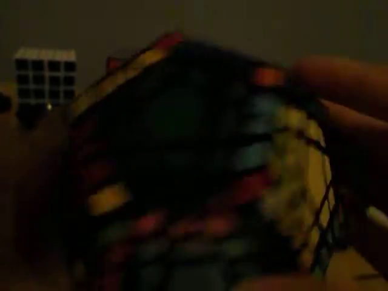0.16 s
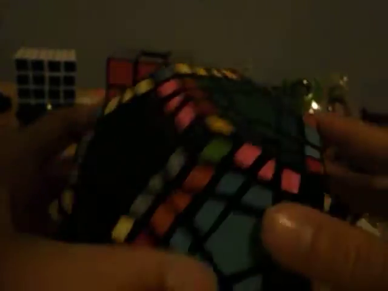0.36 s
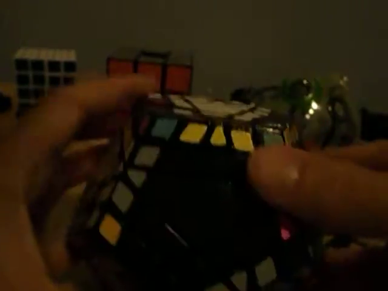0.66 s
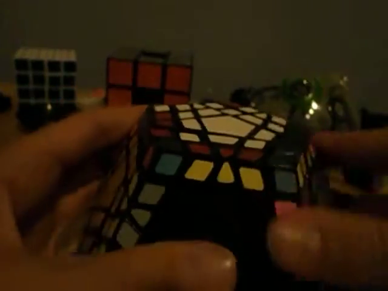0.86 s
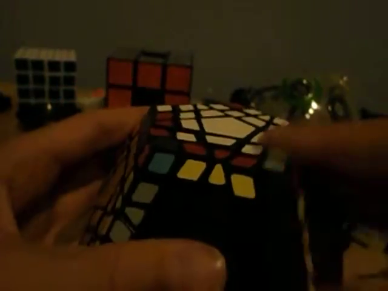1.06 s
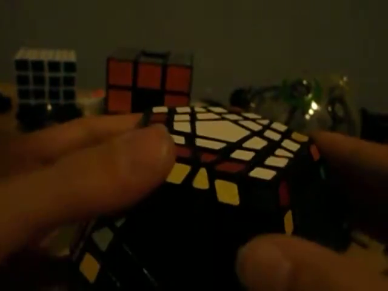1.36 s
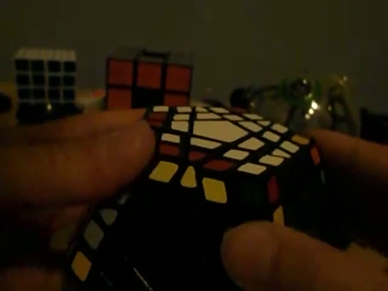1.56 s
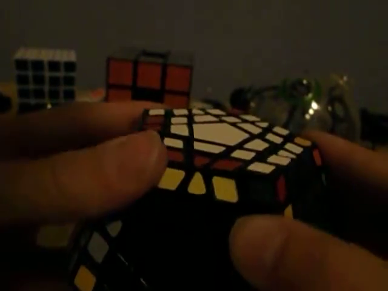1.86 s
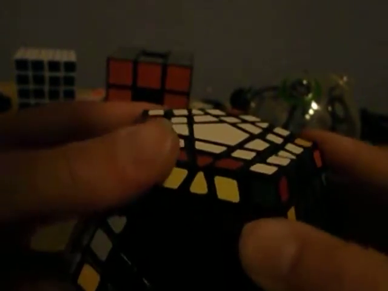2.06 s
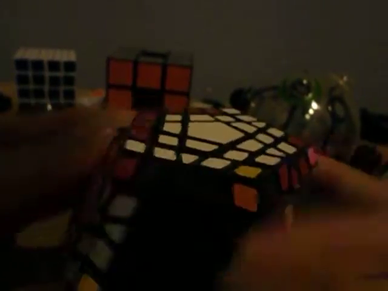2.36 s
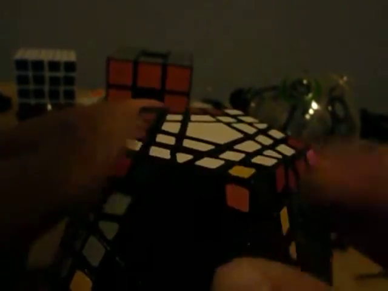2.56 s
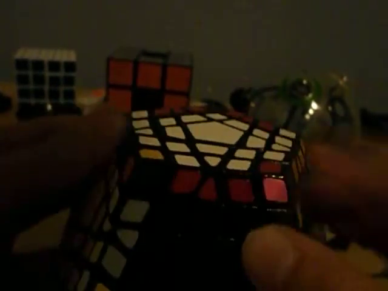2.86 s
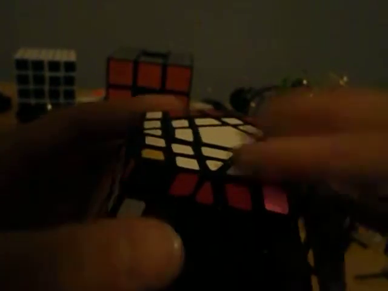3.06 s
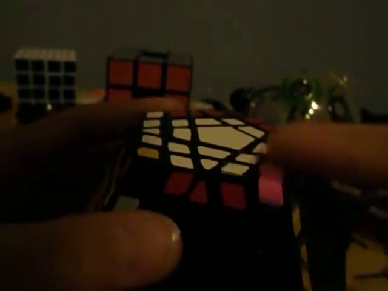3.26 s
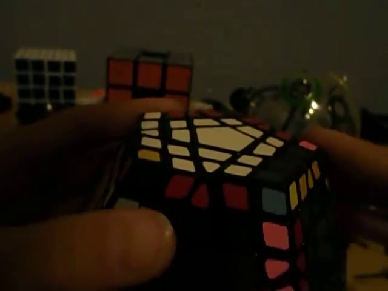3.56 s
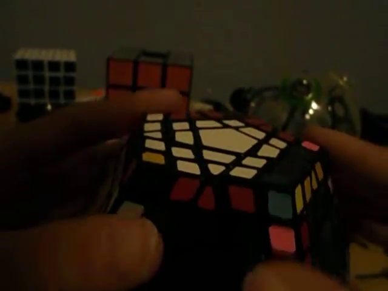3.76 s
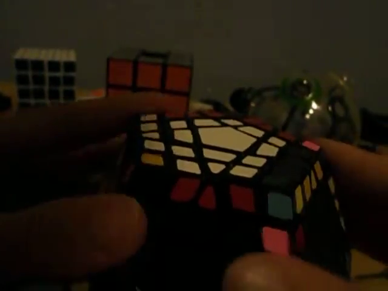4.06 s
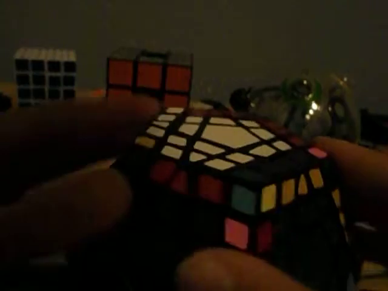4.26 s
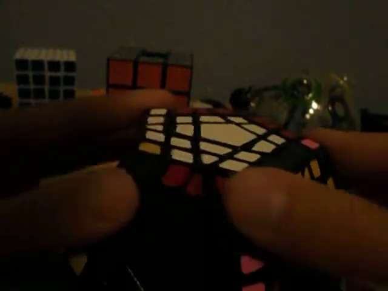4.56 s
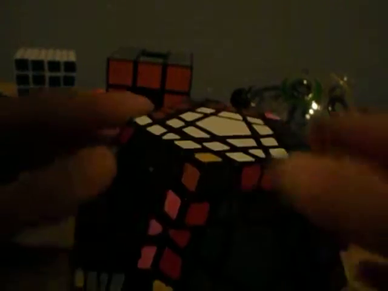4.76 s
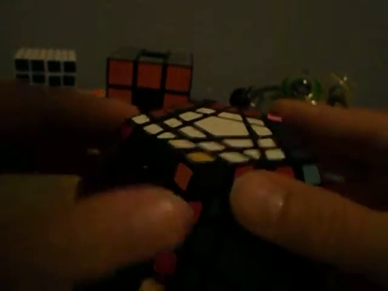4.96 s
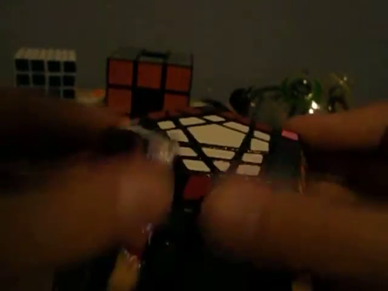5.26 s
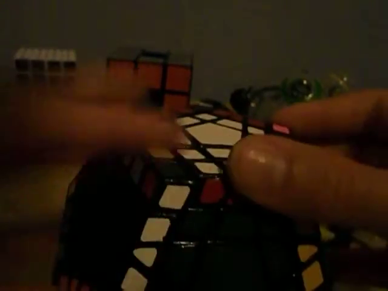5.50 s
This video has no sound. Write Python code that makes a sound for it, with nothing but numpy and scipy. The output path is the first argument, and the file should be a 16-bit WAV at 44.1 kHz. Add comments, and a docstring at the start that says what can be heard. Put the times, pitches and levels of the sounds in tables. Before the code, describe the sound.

Fingers slide dryly over hard plastic, bump its hollow body and snap its layers round. Brief rattling runs of sharp, bright clicks alternate with half-second lulls of light rustling and tiny loose-piece ticks. Close, slightly dull-topped microphone, small quiet indoor space with a short soft tail and faint hush; the strongest clacks are nearly overloaded.

```python
"""First comes the soft hiss of hands shifting their grip on a many-layered plastic twisty puzzle.
Fingertips brush its faces, pieces catch and snap, knocks sound the hollow body, turning layers rattle.
Skin and rattle are trains of tiny random impacts, filtered and swelled with each move of the hands.
Snaps are short filtered noise bursts; knocks are decaying low tones with a woody clack of noise.
A quiet room adds echoes, a brief low hum and a soft tail; a microphone colours and limits it all."""
import sys
import numpy as np
from scipy import signal
from scipy.io import wavfile

SR = 44100
rng = np.random.default_rng(int(sys.argv[2]) if len(sys.argv) > 2 else 0)


def transcribe(signal):
    """Save signal, clipped to [-1, 1], as a 16-bit WAV file at the path in sys.argv[1]."""
    frames = np.atleast_2d(signal).T
    limited = np.clip(frames, -1, 1)
    pcm = np.round(limited * 32767).astype(np.int16)
    wavfile.write(sys.argv[1], SR, pcm)


N = 248283  # length in samples
TIME = np.arange(N) / SR


def amp(db):
    """Turns decibels into a gain."""
    return 10 ** (np.asarray(db) / 20)


def unit(x):
    """Scales a sound to an rms of 1."""
    return x / np.sqrt(np.mean(x ** 2) + 1e-20)


def read(points, hz):
    """Reads a table between its points, along a logarithmic frequency axis."""
    f, value = np.transpose(points)
    return np.interp(np.log(hz + 1), np.log(f + 1), value)


def add(mix, s, sound):
    """Mixes a sound in, starting at s seconds."""
    part = mix[max(round(s * SR), 0):][:len(sound)]
    part += sound[:len(part)]


def colour(x, spectrum, ring_hz=5000, ring_db=0, width_hz=900, size=2048):
    """Filters with a spectrum and one extra resonance; minimum phase, so nothing sounds early."""
    hz = abs(np.fft.fftfreq(size, 1 / SR))
    resonance_db = ring_db / (1 + ((hz - ring_hz) / width_hz) ** 2)
    gain = amp(read(spectrum, hz) + resonance_db)
    minimum_phase = np.exp(np.conj(signal.hilbert(np.log(gain))))
    response = np.fft.ifft(minimum_phase).real
    return signal.fftconvolve(x, response)[:len(x)]


def contacts(per_s, spread_db):
    """Surfaces touch at random points: a train of tiny impacts, most weak and a few strong."""
    size = amp(spread_db * np.minimum(rng.exponential(1, N), 3))
    sign = rng.choice([-1, 1], N)
    return size * sign * (rng.random(N) < per_s / SR)


def envelope(start, length, attack_s, release_s, arch_db, swell_db=0):
    """One move of the hand: rises until start, arches and swells over its length, then dies away."""
    early = np.maximum(start - TIME, 0)
    late = np.maximum(TIME - start - length, 0)
    progress = np.clip((TIME - start) / length, 0, 1)
    effort_db = swell_db * (progress - .5) + arch_db * (np.sin(np.pi * progress) - 1)
    return amp(effort_db) * np.exp(-early / attack_s - late / release_s)


# Tone of hard plastic cracking on plastic. Each row: frequency in Hz, relative level in dB per Hz.
CRACK = [(500, -31), (1300, -29), (2000, -8), (2650, -5), (3300, -6.5), (4200, -3.5), (5500, -0.5),
         (6900, -3), (8800, -4), (11000, -8.5), (16000, -44)]
# Tone of the hollow shell. Each row: frequency in Hz, relative level in dB per Hz.
SHELL = [(90, -34.5), (190, -10.5), (310, -1), (420, -9), (600, -6), (850, 0), (1250, -6), (1700, -16),
         (3000, -28)]


def loose_pieces(count=3):
    """Fingers nudge loose pieces: small irregular ticks, each piece with its own ring and hollow."""
    out = np.zeros(N)
    rings_hz, cavities_hz = np.geomspace(4300, 6100, count), np.geomspace(750, 1250, count)
    for ring_hz, cavity_hz in zip(rings_hz, cavities_hz):
        nudges = contacts(per_s=110, spread_db=6)
        crack = unit(colour(nudges, CRACK, ring_hz=ring_hz, ring_db=6, width_hz=800))
        shell = unit(colour(nudges, SHELL, ring_hz=cavity_hz, ring_db=9, width_hz=110))
        out += amp(-6) * crack + amp(-7) * shell
    return out / np.sqrt(count)


# Tone of skin sliding on plastic. Each row: frequency in Hz, relative level in dB per Hz.
SLIDE = [(150, -2), (450, -6), (900, -2.5), (1900, -4.5), (3300, -4), (5200, -0.5), (7000, -5),
         (10000, -5.5), (16000, -9.5)]
# Tone of dull bumps from the grip. Each row: frequency in Hz, relative level in dB per Hz.
FUMBLE = [(20, -37), (50, -6.5), (85, -15.5), (125, -6.5), (190, 0), (320, 1), (430, -12.5), (900, -16),
          (1600, -14), (4000, -55.5)]
# The hands shift their grip. Each row: start in seconds, length in seconds, level of the sliding hiss
# in dB, level of the dull fumbling in dB (before the levels of its bumps and ticks).
REGRIPS = [(0, 0.19, -51.5, -76), (.32, 0.49, -50.5, -48), (.95, 0.17, -48, -51), (1.23, 0.05, -58, -49.5),
           (1.38, 0.17, -51.5, -44.5), (1.61, 0.048, -47.5, -43), (1.75, 0.16, -53.5, -52),
           (1.95, 0.017, -50, -38), (2.17, 0.075, -47.5, -43.5), (2.3, .12, -45.5, -48.5),
           (2.6, 0.26, -50, -54.5), (3.005, 0.05, -50, -43), (3.34, .2, -52.5, -63),
           (3.58, 0.092, -50, -49.5), (3.72, 0.17, -48.5, -46), (3.9, 0.2, -43.5, -44),
           (4.09, 0.091, -48.5, -54), (4.22, 0.16, -51.5, -44.5), (4.5, 0.18, -49, -52.5),
           (4.72, 0.12, -45.5, -47), (4.87, 0.097, -47.5, -43), (5.045, 0.033, -40, -42.5),
           (5.29, 0.035, -46.5, -49), (5.37, 0.07, -48.5, -42), (5.55, 0.06, -53, -46)]
RESTING_SLIDE_DB, RESTING_FUMBLE_DB = -57, -60.5  # hands just holding the puzzle
TURNING_SLIDE_DB = -43  # hands pushing a layer round
GRIP_ATTACK_S, GRIP_RELEASE_S, GRIP_ARCH_DB = 0.026, 0.025, 2.5  # each move swells towards its middle


def hands():
    """Skin slides over the faces; the shifting grip bumps the body and shuffles loose pieces."""
    slide, fumble = amp(RESTING_SLIDE_DB), amp(RESTING_FUMBLE_DB)
    pushes = [(start, length, TURNING_SLIDE_DB, fumble_db) for start, length, *_, fumble_db in TURNS]
    for start, length, slide_db, fumble_db in list(REGRIPS) + pushes:
        move = envelope(start, length, GRIP_ATTACK_S, GRIP_RELEASE_S, GRIP_ARCH_DB)
        # where moves overlap, the stronger one is heard
        slide = np.maximum(slide, amp(slide_db) * move)
        fumble = np.maximum(fumble, amp(fumble_db) * move)
    skin = contacts(per_s=14000, spread_db=5)
    hiss = slide * unit(colour(skin, SLIDE, ring_hz=4970, ring_db=2, width_hz=1200))
    bumps = amp(-1) * fumble * unit(colour(contacts(per_s=190, spread_db=3.5), FUMBLE))
    return hiss + bumps + fumble * loose_pieces()


# A fingertip brushes over a face. Each row: moment of the peak in seconds, level in dB,
# time to swell or fade in seconds, centre of the bright band in Hz.
BRUSHES = [(0.054, -47, 0.045, 7650), (0.214, -45.5, 0.027, 7050), (.997, -40.5, 0.014, 6130),
           (2.21, -40, 0.047, 5830), (3.905, -45, 0.023, 5460), (4.792, -47, 0.045, 6500),
           (5.31, -44.5, .02, 6050)]


def brushes():
    """Dry skin makes many tiny contacts with a face: a bright swish that swells and fades."""
    out = np.zeros(N)
    for s, db, length_s, hz in BRUSHES:
        skin = contacts(per_s=11000, spread_db=2.5)
        swish = unit(colour(skin, SLIDE, ring_hz=hz, ring_db=26, width_hz=4000))
        out += amp(db) * np.exp(-((TIME - s) / length_s) ** 2) * swish
    return out


# The clearest catches of one piece on another. Each row: moment of release in seconds, crack level in dB,
# time for the chatter to peak in milliseconds, hollow shell level in dB (both levels before a fixed trim).
SNAPS = [(0.112, -31, 0.86, -42), (.2271, -31.5, 0.99, -32), (0.2358, -30.5, 0.91, -28.5),
         (0.2673, -41.5, .8, -33), (.378, -26.5, 0.77, -24.5), (0.491, -38, 1.2, -36.5),
         (.5615, -18.5, .9, -19), (0.6992, -37, 0.33, -34.5), (0.7537, -25, 0.77, -24.5),
         (0.7775, -14.5, 0.67, -20.5), (.789, -21, 1.3, -25.5), (.807, -24, 1.7, -31),
         (.836, -27, 0.55, -28.5), (.861, -22.5, 1.2, -30.5), (.87, -23.5, 1.2, -36),
         (1.2177, -45, 0.35, -46), (1.4135, -29, 1.8, -29), (1.4223, -29.5, .6, -37),
         (1.445, -37, .45, -50), (1.4517, -26.5, .9, -33.5), (1.4874, -42, 1, -52),
         (1.5286, -30, 0.93, -30.5), (1.6324, -43, 0.61, -34), (1.656, -39, 1.6, -31),
         (1.6664, -35.5, 0.92, -42), (1.7217, -39, 1, -36.5), (1.7459, -28, 0.5, -29.5),
         (1.825, -36, 2, -32.5), (1.8811, -40, 0.3, -32.5), (1.919, -39, 0.82, -39),
         (1.944, -34.5, 0.37, -33.5), (1.9778, -36, 0.28, -36), (2.1018, -15, 0.85, -13),
         (2.1183, -9.5, 0.56, -39), (2.1268, -9, 0.69, -41), (2.1362, -12.5, 1.3, -40),
         (2.1406, -11.5, 0.32, -21.5), (2.2556, -30.5, 0.48, -35), (2.275, -40, 2, -40),
         (2.3538, -34.5, 1, -34.5), (2.4044, -36.5, 1.5, -34.5), (2.468, -26, 1.1, -31),
         (2.481, -21, 2.7, -22.5), (2.5011, -12, .8, -18.5), (2.5126, -13, 0.69, -23),
         (2.5204, -14.5, 0.41, -28), (2.5302, -28, 1.5, -32), (2.9237, -41.5, .6, -44),
         (3.028, -35.5, 0.43, -34), (3.0586, -20.5, 1.25, -24.5), (3.073, -30, 1.5, -27),
         (3.1195, -25, 0.85, -23), (3.1363, -23.5, 1, -23), (3.1496, -21, 1.5, -28), (3.27, -35, .9, -40.5),
         (3.5442, -41.5, 1.1, -38.5), (3.6355, -34.5, 0.71, -32.5), (3.7358, -32.5, 0.44, -36.5),
         (3.7762, -38, 0.62, -37.5), (3.7912, -35, 0.77, -36), (3.8486, -36.5, 1, -30),
         (3.9432, -13.5, 1.1, -29), (3.9662, -27.5, .7, -28), (4.0574, -29.5, 1.5, -28),
         (4.1305, -42.5, .7, -50), (4.1765, -35, .85, -35.5), (4.3198, -38, 0.46, -40),
         (4.3632, -38, 0.64, -31.5), (4.3825, -8, 1.5, -21), (4.4026, -13.5, 0.98, -16.5),
         (4.4175, -11, 0.99, -19), (4.4259, -13.5, 1.1, -31), (4.447, -19.5, 1.4, -19.5),
         (4.56, -37.5, 0.72, -42), (4.927, -33, 0.67, -28.5), (4.946, -29.5, 0.29, -33),
         (5.0748, -19, 0.55, -27.5), (5.0935, -21, 0.5, -19), (5.1054, -12.5, 0.37, -35),
         (5.1417, -13, 1, -25), (5.1521, -15.5, 0.28, -23), (5.165, -14, 0.54, -29),
         (5.3667, -27, .3, -33.5), (5.394, -40, 0.82, -43), (5.4378, -19.5, 1.7, -22.5),
         (5.4912, -27, 1.3, -26), (5.5186, -14.5, 0.65, -24.5), (5.5337, -20.5, .8, -27)]
SNAP_RING_HZ, RING_OCTAVES_PER_DB = 6610, 0.02  # the ring of a 0 dB crack; softer catches ring lower


def snaps(slip_db=-24, slip_s=0.0033, size=1280):
    """A piece scrapes, lets go and chatters: its own bright ring, and the clack of the hollow shell."""
    lead_s = .006  # scraping before the release
    out, t = np.zeros(N), np.arange(size) / SR - lead_s
    span = np.sqrt(.004 * SR / size)  # sets levels as rms over 4 ms
    slip = amp(slip_db) * np.exp(-abs(t) / slip_s)  # the scrape builds up to the release, then fades
    noises = rng.standard_normal((len(SNAPS), 2, size))
    cavities_hz = rng.uniform(510, 1204, len(SNAPS))
    for (s, crack_db, chatter_ms, shell_db), noise, cavity_hz in zip(SNAPS, noises, cavities_hz):
        u = np.maximum(t, 0) / max(chatter_ms / 1000, 1 / SR)
        burst = noise * (slip + u * np.exp(-u))
        ring_hz = SNAP_RING_HZ * 2 ** (RING_OCTAVES_PER_DB * crack_db)
        crack = unit(colour(burst[0], CRACK, ring_hz=ring_hz, ring_db=10, width_hz=1660))
        shell = unit(colour(burst[1], SHELL, ring_hz=cavity_hz, ring_db=5.5, width_hz=85))
        snap = amp(crack_db - .5) * crack + amp(shell_db - 3.5) * shell
        add(out, s - lead_s, span * snap)
    return out


# Tone of the woody clack. Each row: frequency in Hz, relative level in dB per Hz.
TOCK = [(500, -15.5), (1000, -9), (1250, 5.5), (1500, 0), (1850, -1.5), (2150, -4), (2600, 0), (3300, -4),
        (5000, -5), (9000, -24)]
# Fingers land on the puzzle. Each row: start in seconds, push level in dB, pitch of the push in Hz,
# level of the woody clack in dB (both levels before a fixed trim).
KNOCKS = [(0.226, -22, 292, -33), (0.377, -22.5, 293, -24.5), (0.486, -33.5, 172, -42),
          (0.562, -15, 208, -25), (1.235, -42, 322, -54), (1.615, -36, 300, -51), (1.722, -37, 300, -43.5),
          (1.982, -42, 198, -49), (2.798, -41, 326, -56), (2.86, -44.5, 173, -52.5),
          (3.265, -33.5, 306, -45), (3.636, -50, 175, -42.5), (3.792, -39.5, 333, -43.5),
          (3.948, -25, 181, -53), (4.055, -40, 161, -44), (4.234, -39, 181.5, -49.5),
          (4.704, -38.5, 195, -55), (4.917, -30, 310, -45)]


def thump(t, peak_s, hz):
    """A heavy body pushed once: a low tone that swells until peak_s and dies away."""
    return t / peak_s * np.exp(1 - t / peak_s) * np.sin(2 * np.pi * hz * t)


def knocks(clack_s=0.0039, ring_s=0.04, ring_db=-21, sway_db=-15, size=8192):
    """A fingertip pushes the whole body for a cycle or two; its stacked layers clack shut and ring on."""
    out, t = np.zeros(N), np.arange(size) / SR
    noises = rng.standard_normal((len(KNOCKS), size))
    decay = np.exp(-t / clack_s) + amp(ring_db) * np.exp(-t / ring_s)
    sway = amp(sway_db) * thump(t, 0.0062, 115)  # the body sways in the palms
    for (s, db, push_hz, clack_db), noise in zip(KNOCKS, noises):
        push = thump(t, 0.0021, push_hz) + sway
        clack = unit(colour(noise, TOCK)) * decay
        add(out, s, amp(db + 2.5) * push)
        add(out, s + 0.000968, amp(clack_db + 5.5) * clack)  # the layers close just after the push
    return out


def stick_slip(per_s=260, depth_db=4):
    """A layer moves in jerks: a gain that glides between random highs and lows every few milliseconds."""
    knots = np.arange(0, N / SR, 1 / per_s)
    jerks_db = depth_db * rng.choice([-1, 1], len(knots))
    return unit(amp(np.interp(TIME, knots, jerks_db)))


# A layer is turned or nudged; hands() plays the last column. Each row: start in seconds, length in
# seconds, rattle level in dB, swell from start to end in dB, hollow shell against the rattle in dB,
# fumbling of the pushing hand in dB (before the levels of its bumps and ticks).
TURNS = [(0.765, 0.098, -29.5, -10, -5.5, -38.5), (1.501, .035, -37.5, -2, -10, -40.5),
         (2.102, 0.038, -17, 3, -7.5, -37.5), (2.462, .074, -25, 6, -4, -40.5),
         (3.057, 0.12, -32.5, 5.5, -3.5, -40), (3.9445, 0.0085, -13, 4, -9, -46),
         (4.382, 0.069, -21, -0.5, -6.5, -37), (4.914, 0.013, -28, -4, -8.5, -46),
         (5.064, .12, -27, 10, -5.5, -38.5), (5.441, .1, -29, 5, -4.5, -38)]
# a layer starts and seats abruptly, and is loudest towards the middle apart from its swell
TURN_ATTACK_S, TURN_RELEASE_S, TURN_ARCH_DB = 0.0015, 0.0037, 3


def rattle(count=6):
    """While a layer moves, its loose pieces tick against their neighbours, each at its own pitch."""
    force, shake = np.zeros(N), np.zeros(N)
    for start, length, db, swell_db, hollow_db, _ in TURNS:
        level = amp(db) * envelope(start, length, TURN_ATTACK_S, TURN_RELEASE_S, TURN_ARCH_DB, swell_db)
        force += level
        shake += level * amp(hollow_db)
    pieces = [contacts(per_s=290, spread_db=3.5) for _ in range(count)]
    cracks = np.zeros(N)
    for piece, hz in zip(pieces, np.geomspace(4100, 7000, count)):
        cracks += colour(piece, CRACK, ring_hz=hz, ring_db=9, width_hz=530)
    shell = unit(colour(sum(pieces), SHELL))
    return stick_slip() * (force * unit(cracks) + shake * shell)


# Low standing waves. Each row: frequency in Hz, gain at that frequency in dB, time to fall 60 dB in seconds.
ROOM_MODES = [(122.3, 4, 0.34), (163.5, 9.5, 0.22), (194.3, 5, 0.25), (242, -5, 0.14), (274.8, -11, 0.1),
              (324.5, 4, 0.12), (386.6, -3.5, 0.33), (454.8, 5.5, 0.32)]
# The soft tail. Each row: frequency in Hz, level in dB, time to fall 60 dB in seconds.
ROOM = [(100, -3, 0.1), (295, -7, 0.21), (870, -16.5, 0.31), (2020, -15, 0.24), (5400, -22.5, 0.36),
        (11000, -26, 0.43)]
# Reflections from the desk and nearby things. Each row: delay in milliseconds, level in dB.
ECHOES = [(1.1, -35), (2.3, -24.5), (3.7, -33.5), (6.4, -21)]


def room(x):
    """Sound returns as near echoes, a few low standing waves and a soft diffuse tail."""
    t = np.arange(SR) / SR
    hz, frame_s, z = signal.stft(rng.standard_normal(SR), SR, nperseg=256)
    level_db, t60 = (read(np.array(ROOM)[:, [0, k]], hz)[:, None] for k in (1, 2))
    # each band of the noise dies away at its own speed
    z *= amp(level_db) * np.exp(-np.log(1000) * frame_s / t60)
    z *= np.sqrt(2 * np.log(1000) / t60 / SR)  # a longer tail does not carry more energy
    late = signal.istft(z, SR, nperseg=256)[1][:SR]
    for k, (mode_hz, db, ring_s) in enumerate(ROOM_MODES):
        decay = np.log(1000) / ring_s
        hum = np.exp(-decay * t) * np.cos(2 * np.pi * mode_hz * t)
        late += (-1) ** k * amp(db) * 2 * decay / SR * hum
    response = np.zeros(SR)
    response[0] = 1  # the direct sound
    add(response, .011, late)
    for ms, db in ECHOES:
        add(response, ms / 1000, amp([db]))
    return signal.fftconvolve(x, response)[:N]


def background_hush():
    """A faint steady hush: a bright and a dull layer of filtered noise."""
    bright = unit(colour(rng.standard_normal(N), SLIDE))
    dull = unit(colour(rng.standard_normal(N), FUMBLE))
    return amp(-62.5) * bright + amp(-64) * dull


def scene():
    """The puzzle in the room, over a faint steady hush."""
    puzzle = hands() + brushes() + snaps() + knocks() + rattle()
    return (room(puzzle) + background_hush())[None]


# The microphone's colour. Each row: frequency in Hz, gain in dB.
MICROPHONE = [(20, -30), (50, -2.5), (75, -18.5), (110, -0.5), (7100, 0), (7450, -3), (7700, -17.5),
              (7950, -1.5), (8300, -1.5), (10000, -3), (11000, -12), (12000, -19), (12800, -48)]
EDGE_HZ = 16300  # upper limit of the band


def record(dry):
    """The microphone colours the sound, rounds off the loudest peaks and cuts the highest treble."""
    x = colour(dry[0], MICROPHONE, size=8192)
    x = x / (1 + (x / .8) ** 6) ** (1 / 6)  # overload: peaks stay below 0.8
    lowpass = signal.firwin(511, EDGE_HZ, window=("kaiser", 9), fs=SR)
    return signal.fftconvolve(x, lowpass, "same")[None]


dry = scene()
out = record(dry)
transcribe(out)
```